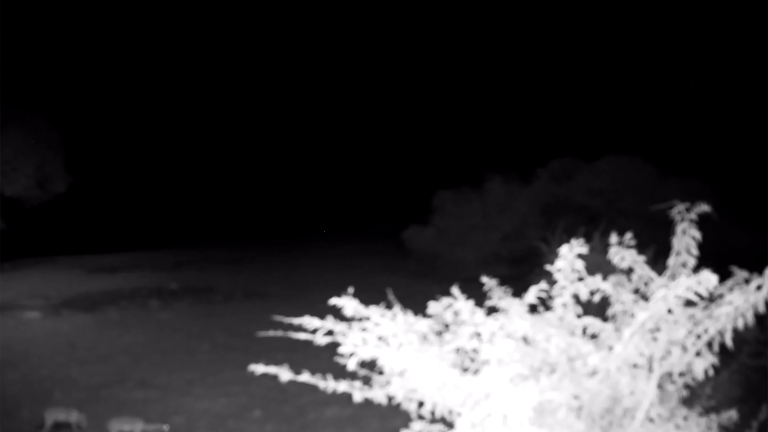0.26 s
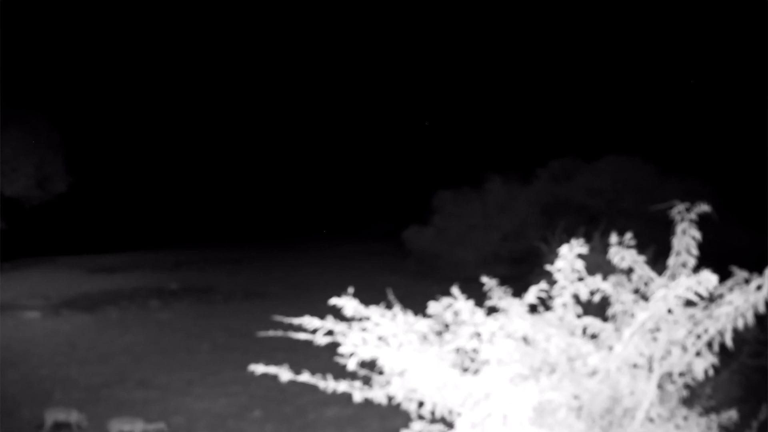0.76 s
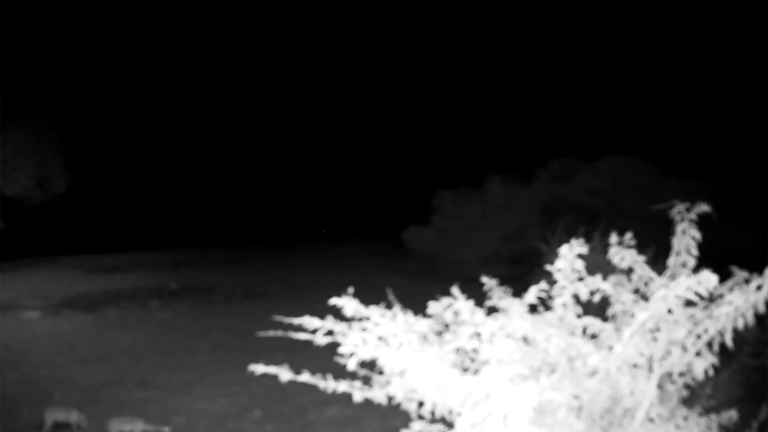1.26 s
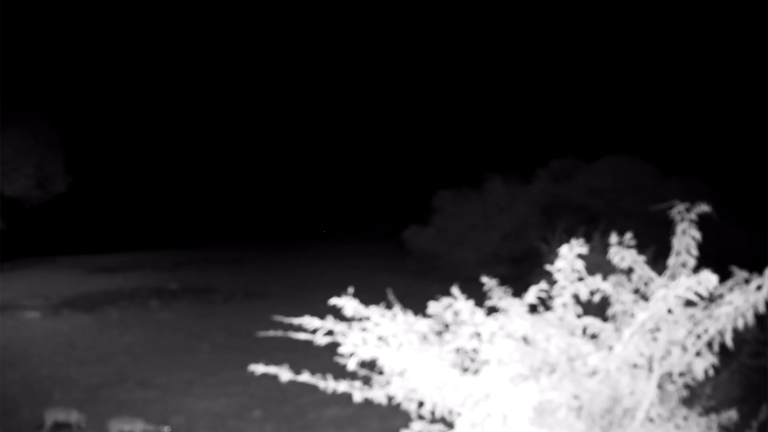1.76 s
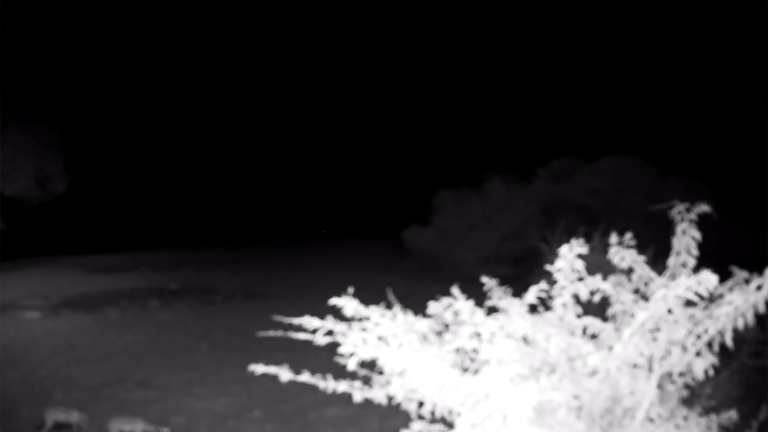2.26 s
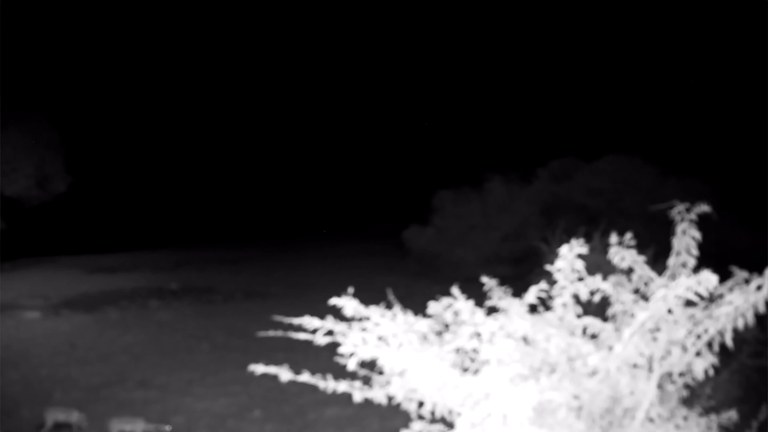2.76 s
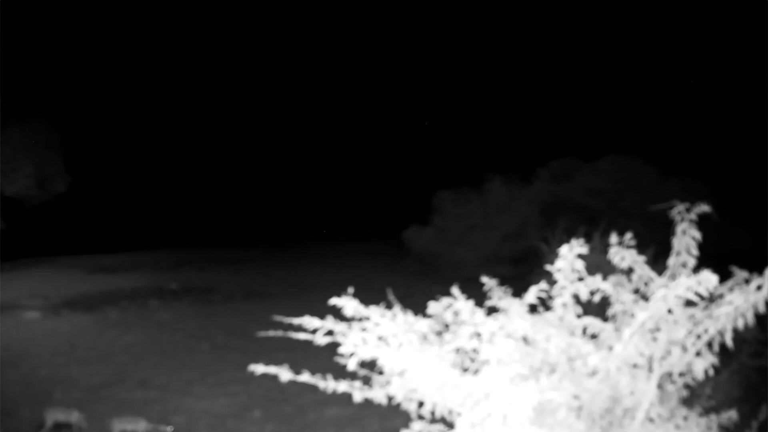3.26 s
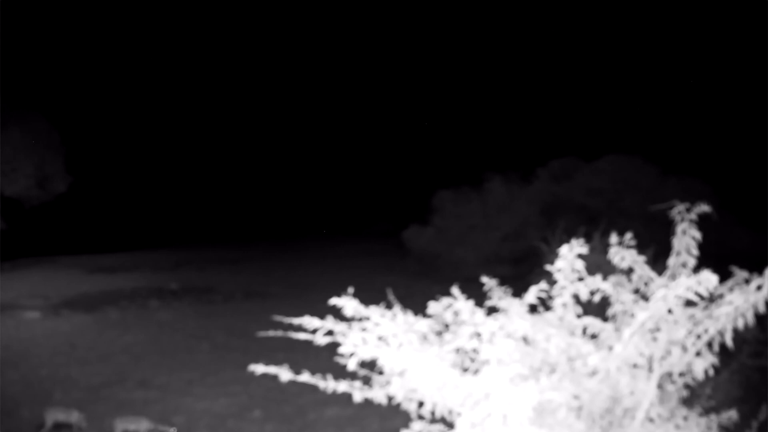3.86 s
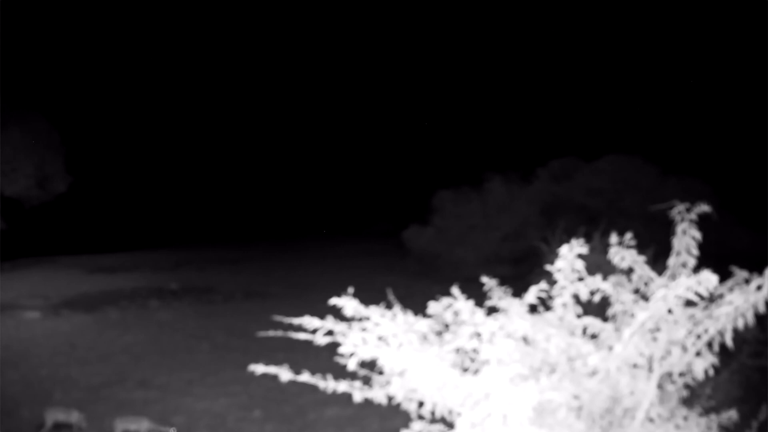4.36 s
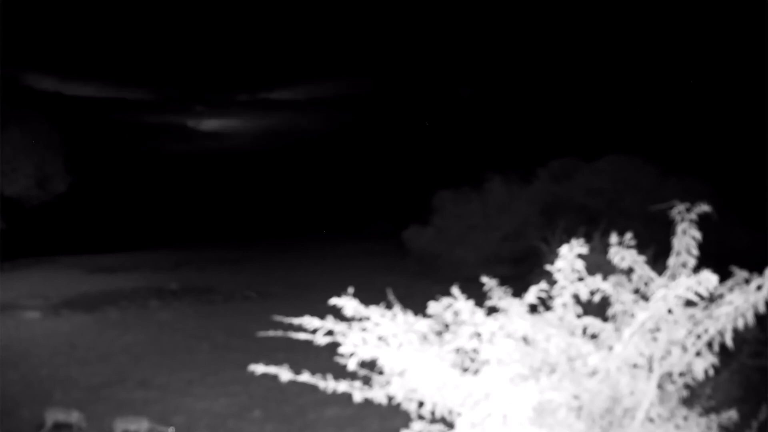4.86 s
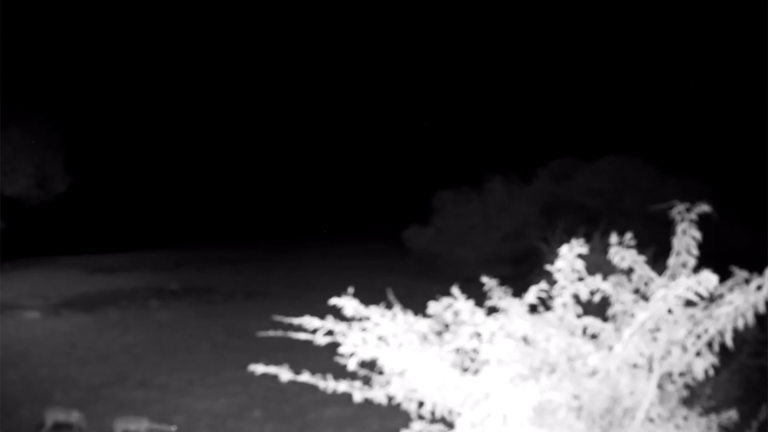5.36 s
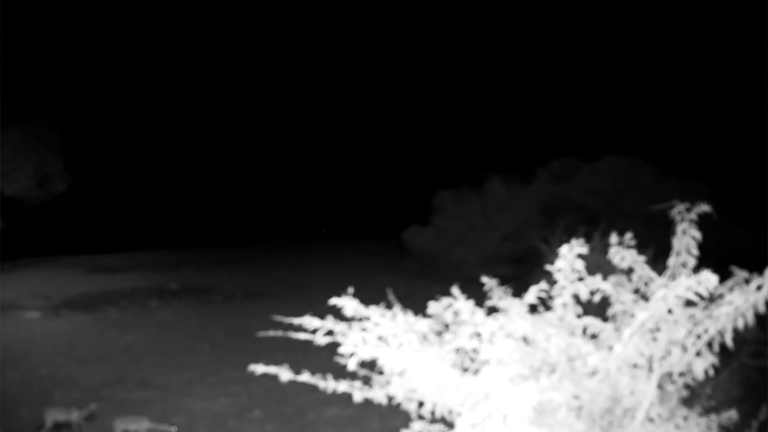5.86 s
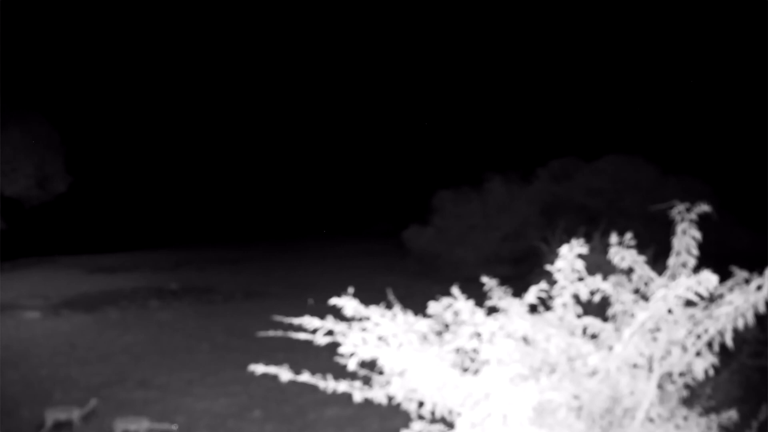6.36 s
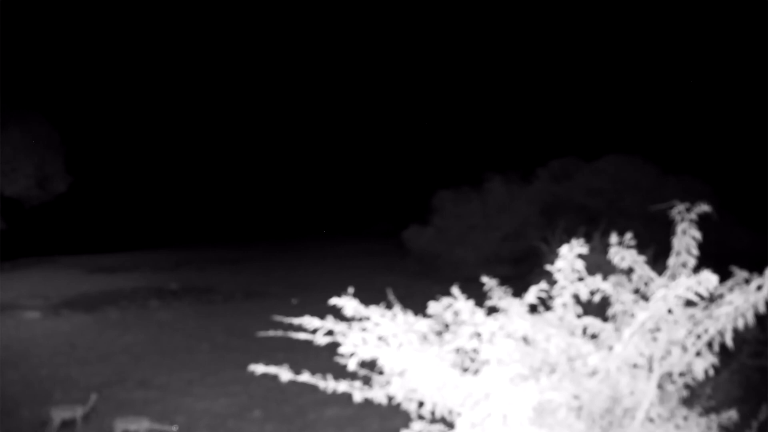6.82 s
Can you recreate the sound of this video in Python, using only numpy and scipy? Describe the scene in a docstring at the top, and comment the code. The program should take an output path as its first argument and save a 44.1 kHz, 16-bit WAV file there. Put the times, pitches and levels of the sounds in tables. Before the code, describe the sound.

A steady, bright night chorus from start to finish: shimmering high rasps, lower dry rattles, pulsing cricket sounds. On top, a close frog whistles brief rising peeps at an even pace, loudest near the middle, while others give tiny throbbing whoops sweeping up from low to about 2 kHz. Occasional buzzy click runs, chips and upward zips. Slight open-air tail and echo, faint low rush, thin camera microphone with a very faint electronic whine.

```python
"""Pure frog peeps and bubbling upward whoops stand out of a shrill crowd of insect rasps and rattles at night.
Rasps, rattles, clicks, chips and zips are pulsed gliding tones; their far crowds are coloured noise.
Peeps, whoops and slides are swept sines. A bush cricket's tooth clicks ring its wing about ten times a second;
two other crickets trill and chirp in sines. Light taps, air noise, a low rush and a thin whine lie beneath.
Open ground adds a thin tail; an outdoor camera's small microphone cuts the bass and the extreme top."""
import sys
import numpy as np
from scipy import signal
from scipy.fft import rfft, irfft
from scipy.io import wavfile
from scipy.ndimage import uniform_filter1d

SR = 44100
rng = np.random.default_rng(int(sys.argv[2]) if len(sys.argv) > 2 else 0)


def unload_audio(sound):
    """Save the sound as a 16-bit wav file, at the path given as the first command line argument."""
    columns = np.transpose(np.atleast_2d(sound))
    # keep every value between -1 and 1, then stretch to whole-number steps
    steps = np.round(np.clip(columns, -1, 1) * 32767)
    wavfile.write(sys.argv[1], SR, steps.astype(np.int16))


N = 312669
TIME = np.arange(N) / SR


def from_db(db):
    """Decibels to gain."""
    return 10 ** (np.asarray(db) / 20)


def rms_one(x):
    """Scale to unit power."""
    return x / np.sqrt(np.mean(x ** 2) + 1e-20)


def read(rows, at):
    """Every column of a table after the first, joined by straight lines."""
    first, *columns = np.transpose(rows)
    return [np.interp(at, first, c) for c in columns]


def add(out, start_s, sound):
    """Mix a sound in at its time."""
    i = int(round(start_s * SR))
    a, b = max(i, 0), min(i + len(sound), N)
    if b > a:
        out[a:b] += sound[a - i:b - i]


def band(x, low_hz, high_hz, order=2):
    """Band-pass."""
    sos = signal.butter(order, [low_hz, high_hz], "band", fs=SR, output="sos")
    return signal.sosfilt(sos, x + 1e-18)


def resonate(x, hz, width_hz):
    """One two-pole resonance, gain about 1 on top."""
    r = np.exp(-np.pi * width_hz / SR)
    zeros = np.array([1, 0, -1]) * (1 - r * r) / 2
    poles = [1, -2 * r * np.cos(2 * np.pi * hz / SR), r * r]
    return signal.lfilter(zeros, poles, x + 1e-18)


def sine(hz):
    """Sine that follows a pitch course in Hz."""
    return np.sin(2 * np.pi * np.cumsum(hz) / SR)


def noise(spectrum):
    """Noise of a given colour, interpolated over log frequency; rms 1."""
    hz, db = np.transpose(spectrum)
    bins_hz = np.maximum(np.fft.rfftfreq(N, 1 / SR), 1)
    gain = from_db(np.interp(np.log(bins_hz), np.log(hz), db))
    return rms_one(irfft(rfft(rng.standard_normal(N)) * gain, N))


def drift(knots_per_s):
    """Random course through evenly spaced knots, rms 1."""
    knots = rng.standard_normal(8192)
    return rms_one(np.interp(TIME * knots_per_s, np.arange(len(knots)), knots))


def open_ground(x, wet_db, t60_s):
    """Bushes and trees scatter a thin, decaying noise tail back."""
    t = np.arange(SR // 2) / SR
    build_up = 1 - np.exp(-t / 0.0062)
    tail = rng.standard_normal(len(t)) * from_db(-60 * t / t60_s) * build_up
    return x + from_db(wet_db) * signal.fftconvolve(x, tail / np.linalg.norm(tail))[:N]


def pulsed_note(length_s, hz, glide, pulse_hz, sharpness, uneven_db):
    """A gliding tone that swells and fades, chopped into pulses of unequal strength and phase; rms 1."""
    t = np.arange(int(length_s * SR)) / SR
    chance_db, chance_phase = rng.standard_normal((2, 128))
    cycle = t * pulse_hz + rng.random()
    which = cycle.astype(int) % len(chance_db)
    pulses = np.abs(np.sin(np.pi * (cycle % 1) ** 0.75)) ** sharpness
    pulses = pulses * from_db(uneven_db * chance_db[which])
    phase = 2 * np.pi * np.cumsum(hz * (1 + glide * (t / length_s - .5))) / SR
    tone = np.sin(phase + 0.77 * chance_phase[which])
    return rms_one(np.sin(np.pi * t / length_s) * pulses * tone)


def crowd(count, hz, spread_hz, length_s, glide, pulse_hz, sharpness, spread_db):
    """Many callers at random times, each with its own pitch, pace, length and distance; level evened."""
    out = np.zeros(N)
    starts_s = rng.uniform(-length_s, N / SR, count)
    traits = rng.uniform(-0.999, 1, (count, 4))
    for start_s, (pitch, pace, size, near) in zip(starts_s, traits):
        note = pulsed_note(length_s * 1.5 ** size, hz + spread_hz * pitch, glide,
                           pulse_hz * 1.4 ** pace, sharpness, uneven_db=3.5)
        add(out, start_s, from_db(spread_db * near) * note)
    power = np.abs(uniform_filter1d(out ** 2, SR // 4))
    return out / np.sqrt(power + 1e-9)


def near_notes(rows, length_s, glide, pulse_hz, sharpness, uneven_db):
    """Pulsed notes of close callers; rows: middle t/s, relative level/dB, f/Hz."""
    out = np.zeros(N)
    for s, db, hz in rows:
        pace_hz = pulse_hz * 1.3 ** rng.uniform(-0.9, 1)
        note = pulsed_note(length_s, hz, glide, pace_hz, sharpness, uneven_db)
        add(out, s - length_s / 2, from_db(db) * note)
    return out


def passing_notes(crowd_level, gap_s, offset_db, spread_db, hz, spread_hz):
    """Nearby callers at loose intervals, their levels following the crowd; rows for near_notes."""
    chance = rng.uniform(-1, 1, (160, 3))
    s = np.cumsum(gap_s * 2 ** chance[:, 0])
    crowd_db, = read(crowd_level, s)
    level_db = crowd_db + offset_db + spread_db * chance[:, 1]
    rows = np.column_stack([s, level_db, hz + spread_hz * chance[:, 2]])
    return rows[s < N / SR]


def sweeps(rows, shape, pulse_hz, depth):
    """A throbbing tone sweeps up about an octave and a half as the vocal sac fills."""
    out = np.zeros(N)
    for s, db, length_s in rows:
        t = np.arange(int(length_s * SR)) / SR
        hz, swell = read(shape, t / length_s)
        throb = 1 - depth * np.sin(np.pi * pulse_hz * t) ** 2
        add(out, s, from_db(db) * swell * throb * sine(hz))
    return out


def air_hiss():
    """Still air and microphone hiss: steady coloured noise."""
    # hiss colour: f/Hz, relative density/dB
    hiss_colour = [(25, -53), (75, -33), (125, -16.5), (220, -12.5), (400, -2.5), (540, 5), (750, -0.5),
                   (1300, -1), (2200, 10), (5000, -18.5), (9300, -20), (10200, -6.5), (11400, -3),
                   (12500, -13)]
    return from_db(-47.5) * noise(hiss_colour)


def distant_rush():
    """Distant low rush: coloured noise with a slowly varying level."""
    # rush course: t/s, relative level/dB
    rush_level = [(0.0, -67), (0.8, -79), (2.25, -57), (3.1, -61.5), (4.7, -49.5), (5.5, -53),
                  (7.09, -63.5)]
    # rush colour: f/Hz, relative density/dB
    rush_colour = [(60, -39), (125, -9.5), (230, 1.5), (450, 3.5), (800, 1), (1500, -47)]
    level_db, = read(rush_level, TIME)
    return from_db(level_db - 3.5) * noise(rush_colour)


def whine():
    """Camera electronics: faint unsteady lines high in the hiss, each narrowly resonated noise."""
    # lines: f/Hz, level/dB
    whine_lines = [(10055, -72), (10837, -70), (10997, -69), (11153, -67.5), (11305, -66), (11444, -63.5),
                   (11611, -65), (11953, -66), (12158, -64)]
    return sum(from_db(db) * rms_one(resonate(rng.standard_normal(N), hz, 45)) for hz, db in whine_lines)


def ticks():
    """Light taps close by: a few damped modes that die at once."""
    # taps: start t/s, relative level/dB
    tap_times = [(0.225, -25), (0.428, -30.5), (2.235, -48), (2.389, -44), (2.468, -42)]
    # ringing modes: f/Hz, relative level/dB, t60/s
    tap_modes = [(595, -8, 0.019), (820, 2, 0.013), (1210, -4, 0.019), (1390, 2.5, 0.013)]
    out, t = np.zeros(N), np.arange(SR // 20) / SR
    tap = sum(from_db(db - 60 * t / t60_s) * np.sin(2 * np.pi * hz * t) for hz, db, t60_s in tap_modes)
    for s, db in tap_times:
        add(out, s, from_db(db) * tap)
    return out


def stray_frogs():
    """Odd short chips, and one far croak that starts as rough noise and ends on a low note."""
    # chips: middle t/s, level/dB, f/Hz
    chip_rows = [(.578, -29, 2716), (.662, -32.5, 2640), (.795, -34, 2610), (3.862, -30.5, 2742),
                 (5.875, -31, 2790), (5.972, -34, 2340), (6.715, -24, 2750), (6.922, -27, 2666)]
    # croak: t/s, relative level/dB, f/Hz
    croak_row = (6.487, -42, 760)
    chips = near_notes(chip_rows, length_s=0.02, glide=-0.065, pulse_hz=194, sharpness=0.71, uneven_db=2.0)
    s, db, hz = croak_row
    croak, t = np.zeros(N), np.linspace(0, .035, int(0.0348 * SR))
    swell = np.hanning(len(t))
    rough = rms_one(band(rng.standard_normal(len(t)), 920, 2300))
    add(croak, s - .028, from_db(db + 7.5) * swell * rough)
    add(croak, s - .012, from_db(db + 2.0) * swell * np.sin(2 * np.pi * hz * t))
    return chips + open_ground(croak, wet_db=-3, t60_s=0.54)


def zips():
    """Brief rough notes that shoot upwards."""
    # zips: middle t/s, level/dB, f/Hz
    zip_rows = [(1.036, -27.5, 2750), (4.205, -27, 2900), (6.022, -29, 3500), (6.149, -29.5, 3390)]
    return near_notes(zip_rows, length_s=.026, glide=0.402, pulse_hz=300, sharpness=.8, uneven_db=2.0)


def clicking_frog():
    """Runs of brief buzzy notes at an even pace."""
    # runs: first note t/s, notes, spacing/s, relative level/dB, f/Hz
    click_runs = [(.03, 5, 0.048, -26.5, 3734), (2.993, 6, .045, -24, 3990), (3.523, 4, .05, -34.5, 4310),
                  (5.176, 5, .0445, -29.5, 4040), (6.534, 4, 0.055, -31.5, 4000)]
    notes = [(s + k * spacing_s, db, hz)
             for s, count, spacing_s, db, hz in click_runs for k in range(int(round(count)))]
    buzz = near_notes(notes, length_s=.02, glide=0.087, pulse_hz=416, sharpness=.7, uneven_db=5.0)
    return from_db(-3.0) * buzz


def trill():
    """A cricket's unbroken low trill of sine pulses, with the noise blur of farther ones around it."""
    # trill course: t/s, relative level/dB
    trill_level = [(0.0, -43), (0.65, -42.5), (1.75, -47), (3.14, -40.5), (4.0, -38.5), (4.7, -41),
                   (5.8, -43), (7.09, -42)]
    level_db, = read(trill_level, TIME)
    stroke, cycle = np.divmod(TIME * 91.5, 1)  # strokes/s
    # every stroke rings the wing anew
    start_phase = 1.78 * rng.standard_normal(int(stroke[-1]) + 1)[stroke.astype(int)]
    pitch_hz = 1685 - 60 * (cycle - .5)  # each pulse sags as the wing slows
    tone = np.sin(2 * np.pi * np.cumsum(pitch_hz) / SR + start_phase)
    near = rms_one(np.sin(np.pi * cycle) ** 2 * tone) * from_db(1.4 * drift(30))
    far = rms_one(band(rng.standard_normal(N), 1622, 1780, order=3))
    return from_db(level_db - 2.5) * (near + .5 * far)


def chirping_cricket(syllable_s, spacing_s, base_db):
    """Chirps of four or five pure syllables of uneven strength, falling in pitch as the wings close."""
    # bouts: first syllable t/s, chirps, chirp period/s, syllables per chirp
    chirp_bouts = [(.054, 4, .274, 5), (1.254, 2, .24, 4), (1.79, 3, .274, 5), (2.592, 2, .219, 4),
                   (3.054, 4, .277, 5), (4.146, 2, .223, 4), (4.64, 2, .298, 4), (5.168, 5, .225, 4),
                   (6.375, 3, .275, 5)]
    out, share = np.zeros(N), np.linspace(0, 1, int(syllable_s * SR))
    turns = np.cumsum(5350 - 350 * share - 150 * share ** 2) / SR  # from a pitch in Hz
    for first_s, chirps, period_s, syllables in chirp_bouts:
        for s in first_s + period_s * np.arange(chirps):
            for k, (strength_db, phase) in enumerate(rng.standard_normal((int(syllables), 2))):
                syllable = np.sin(np.pi * share) ** 2 * np.sin(2 * np.pi * (turns + phase))
                add(out, s + k * spacing_s - syllable_s / 2, from_db(base_db + strength_db) * syllable)
    return out


def strikes(per_s):
    """A unit click each time a cycle of the given rate is completed."""
    return np.diff(np.floor(np.cumsum(per_s) / SR), prepend=-1.)


def bush_cricket():
    """A file drags over a scraper: tooth clicks swell, fade and stop as the wings reopen, with one light touch."""
    # effort: t/s, relative level/dB
    effort = [(0.08, -50.5), (0.69, -49), (1.21, -54.1), (1.62, -52.0), (2.13, -43.5), (2.54, -49.5),
              (2.74, -41.5), (3.05, -46), (3.56, -38.5), (3.87, -40), (4.17, -50.2), (4.28, -45),
              (4.79, -40.5), (5.4, -47.5), (5.71, -41), (6.01, -40.6), (6.53, -51.5), (7.04, -40.5)]
    effort_db, = read(effort, TIME)
    stroke = (TIME - .049) / .10234 % 1  # period/s
    pressure = np.interp(stroke, [0, .2, .42, .53, .62, .84, .89, .94], [0, .55, 1, .9, 0, 0, .07, 0])
    tooth_hz = 630 * (1 - 0.28 * stroke) * (1 + 0.033 * drift(250))  # the wing slows along the stroke
    teeth = strikes(tooth_hz) * pressure * from_db(1.6 * drift(500))
    wing = resonate(teeth, 7413, 480) - from_db(-20.0) * resonate(teeth, 8830, 580)
    soft = rms_one(band(wing, 6460, 7760, order=6))
    hard = rms_one(band(wing, 6300, 9700, order=3))
    bright = np.clip((effort_db + 54.0) / 14, .1, 1)  # harder strokes wake the upper wing resonance
    return from_db(effort_db + 1.0) * (np.sqrt(1 - bright) * soft + np.sqrt(bright) * hard)


def low_rattles():
    """Slower pulse trains near 3 kHz; the far ones merge into a noise shimmer."""
    # near rattles: middle t/s, relative level/dB, f/Hz
    rattle_rows = [(0.632, -20.5, 3250), (1.704, -23.5, 3110), (1.878, -22, 3195), (2.402, -20.5, 3090),
                   (2.83, -23, 3300), (2.994, -24, 3180), (3.305, -24, 3220), (4.214, -25, 3010)]
    # crowd course: t/s, relative level/dB
    rattle_level = [(0.0, -29), (0.55, -28), (1.05, -31), (1.75, -27), (3.9, -26), (5.5, -29.5),
                    (6.3, -29.5), (7.09, -27)]
    # far crowd colour: f/Hz, relative density/dB
    rattle_colour = [(1700, -36), (2000, -12.5), (2450, -8), (2750, 4), (3100, 8), (3450, 3), (3850, -3.5),
                     (4300, -13), (5000, -32)]
    level_db, = read(rattle_level, TIME)
    middle = crowd(count=760, hz=3196, spread_hz=415, length_s=.02, glide=0.077,
                   pulse_hz=224.7, sharpness=2.4, spread_db=4.0)
    far = noise(rattle_colour) * from_db(2.5 * drift(260))
    passing = passing_notes(rattle_level, gap_s=.11, offset_db=1.0, spread_db=2.0, hz=3140, spread_hz=149)
    near = near_notes([*rattle_rows, *passing], length_s=.02, glide=0.052,
                      pulse_hz=243.4, sharpness=2.7, uneven_db=1.6)
    return from_db(level_db) * (from_db(-4.5) * middle + from_db(-5.0) * far) + from_db(-2.5) * near


def high_rasps():
    """Fast-pulsed falling rasps near 6 kHz; the far ones merge into a noise shrill."""
    # near rasps: middle t/s, relative level/dB, f/Hz
    rasp_rows = [(0.19, -18, 6020), (2.42, -16, 5880), (3.202, -14, 6080), (3.314, -14, 6130),
                 (3.372, -15.5, 5800), (3.518, -13.5, 6160), (3.56, -15.5, 6130), (3.637, -14.5, 5800),
                 (4.003, -15, 5960), (5.249, -15, 5700)]
    # crowd course: t/s, relative level/dB
    rasp_level = [(0.08, -26.5), (0.69, -26), (0.8, -30.5), (2.43, -24), (2.84, -26), (3.05, -21.8),
                  (3.15, -26.5), (3.97, -21.5), (4.28, -25), (4.48, -22.5), (4.68, -25.5), (7.04, -23.5)]
    # far crowd colour: f/Hz, relative density/dB
    rasp_colour = [(4300, -6.5), (4750, -6.5), (5150, 2), (5700, 6.5), (6150, 7.5), (6600, -2), (7100, -16),
                   (7800, -41), (8800, -44)]
    level_db, = read(rasp_level, TIME)
    middle = crowd(count=480, hz=5974, spread_hz=460, length_s=.032, glide=-0.0798,
                   pulse_hz=516.0, sharpness=1.24, spread_db=6.5)
    far = noise(rasp_colour) * from_db(2.0 * drift(70))
    passing = passing_notes(rasp_level, gap_s=.13, offset_db=4.0, spread_db=-0.5, hz=5810, spread_hz=218)
    near = near_notes([*rasp_rows, *passing], length_s=0.025, glide=-0.049,
                      pulse_hz=493, sharpness=2.9, uneven_db=1.5)
    mass = from_db(level_db) * (from_db(-5.5) * middle + from_db(-6.0) * far) * from_db(0.78 * drift(9.9))
    return band(mass + from_db(-8.0) * near, 4310, 8370, order=3)


def whoops(echo_s, echo_db):
    """Quick pulsed whoops and slow slides; the vocal sac rings near 2 kHz and the trees send one echo."""
    # whoops: start t/s, relative level/dB, length/s
    whoop_rows = [(0.251, -26, 0.04), (0.481, -26.5, 0.047), (.999, -24.5, 0.046), (1.262, -19, 0.046),
                  (1.615, -24, 0.046), (2.689, -30.5, 0.055), (2.73, -25, 0.047), (2.979, -23.5, 0.04),
                  (3.163, -28.5, .048), (3.923, -15, 0.045), (4.164, -24, .048), (4.892, -19.5, 0.047),
                  (5.332, -20.5, 0.031), (5.582, -22, 0.047), (6.062, -18, 0.046), (6.248, -26.5, 0.044),
                  (6.291, -23, 0.049)]
    # whoop course: share of length, f/Hz, amplitude
    whoop_course = [(0, 852, 0.2), (.08, 788, 0.38), (.2, 863, 0.4), (.33, 1170, 0.69), (0.449, 1615, 1),
                    (.58, 1963, 1), (.72, 2105, 0.73), (.86, 2104, 0.79), (1, 2380, 0.07)]
    # slides: start t/s, relative level/dB, length/s
    slide_rows = [(.52, -42, .09), (1.385, -38, 0.087), (1.51, -41.5, 0.068), (2.903, -28.5, 0.078),
                  (3.045, -41, .1), (5.475, -40.5, 0.098)]
    # slide course: share of length, f/Hz, amplitude
    slide_course = [(0, 860, 0), (0.149, 965, .35), (0.349, 1233, 0.5), (0.549, 1690, 1), (.72, 1980, 0.9),
                    (.88, 2250, 0.4), (1, 2300, 0)]
    slides = sweeps(slide_rows, slide_course, pulse_hz=256, depth=0.2)
    calls = sweeps(whoop_rows, whoop_course, pulse_hz=243.2, depth=0.92) + 1.23 * slides
    # the slides also arrive by longer paths, which break them up
    for delay_s in rng.uniform(0.00324, 0.016, size=3):
        add(calls, delay_s, 0.36 * slides)
    voiced = band(calls + from_db(-12) * resonate(calls, 2100, 45), 790, 3350, order=4)
    out = voiced.copy()
    add(out, echo_s, from_db(echo_db) * voiced)
    return out


def peeps():
    """Frogs' pure whistles that slide up about a tone."""
    # peeps: start t/s, level/dB, starting f/Hz
    peep_rows = [(0.422, -16.5, 2640), (1.307, -11, 2646), (2.145, -11.5, 2594), (2.886, -10.5, 2644),
                 (3.698, -6.5, 2640), (4.444, -12, 2633), (5.151, -13, 2635), (5.915, -13, 2627),
                 (6.749, -11, 2636)]
    # peep course: t/s, pitch ratio, amplitude
    peep_course = [(-.002, 1, 0), (.004, 1, .5), (.011, 1.003, .7), (.02, 1.033, 1), (.03, 1.07, .93),
                   (.04, 1.098, .62), (.05, 1.113, .33), (.058, 1.117, .16), (.067, 1.11, 0)]
    out = np.zeros(N)
    t = np.arange(peep_course[0][0], peep_course[-1][0], 1 / SR)
    ratio, swell = read(peep_course, t)
    for s, db, hz in peep_rows:
        add(out, s + t[0], from_db(db) * swell * sine(hz * ratio))
    return out


def scene():
    """All callers over the night's faint rush, hiss and whine."""
    floor = air_hiss() + distant_rush() + whine()
    taps = open_ground(band(ticks(), 535, 1700, order=3), wet_db=-16, t60_s=0.43)
    chirps = chirping_cricket(syllable_s=.023, spacing_s=.0315, base_db=-29)
    crickets = trill() + chirps + bush_cricket()
    chorus = stray_frogs() + zips() + clicking_frog() + low_rattles() + high_rasps()
    whooping = open_ground(whoops(echo_s=0.055, echo_db=-22), wet_db=-11.5, t60_s=0.73)
    peeping = open_ground(peeps(), wet_db=-15.0, t60_s=0.11)
    return (floor + taps + crickets + chorus + whooping + peeping)[None]


def record(dry):
    """The small microphone has little bass; the top is cut steeply."""
    low_cut_hz, high_cut_hz = 122, 12550
    thin = signal.sosfilt(signal.butter(3, low_cut_hz, "high", fs=SR, output="sos"), dry)
    return signal.sosfilt(signal.ellip(12, .1, 90, high_cut_hz, fs=SR, output="sos"), thin)


dry = scene()
out = record(dry)
unload_audio(out)
```